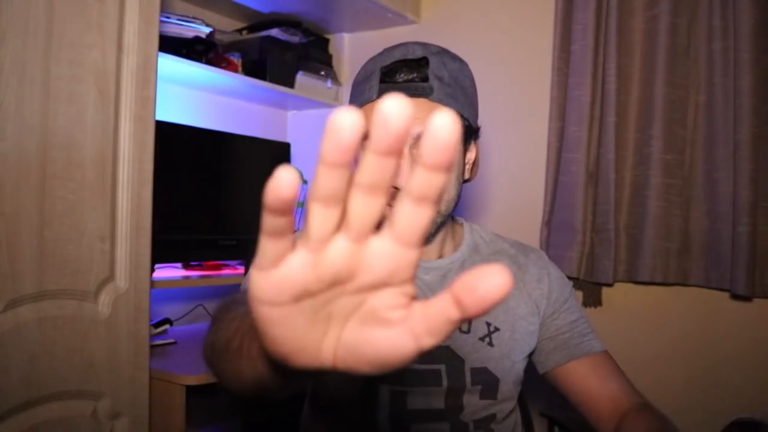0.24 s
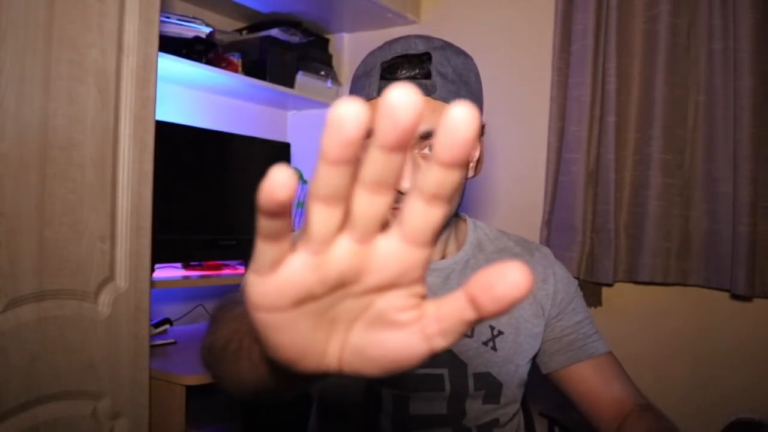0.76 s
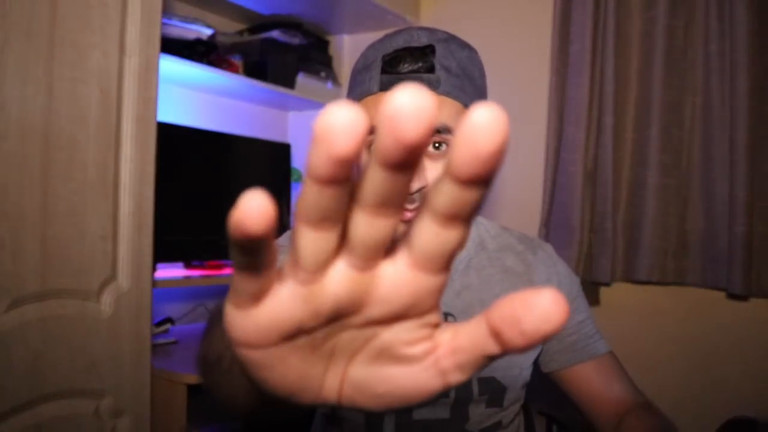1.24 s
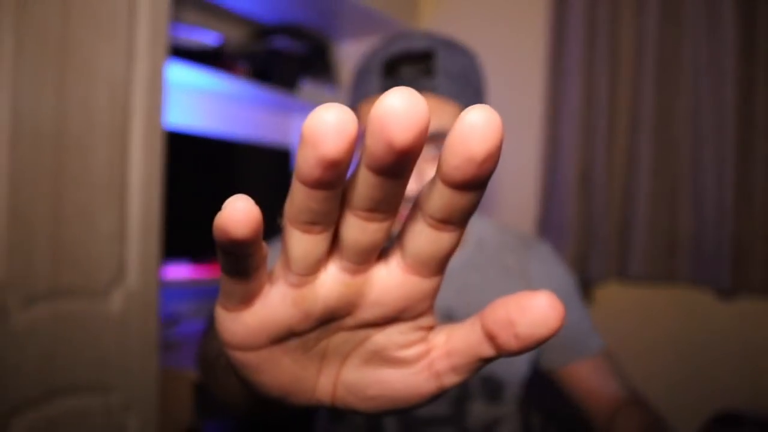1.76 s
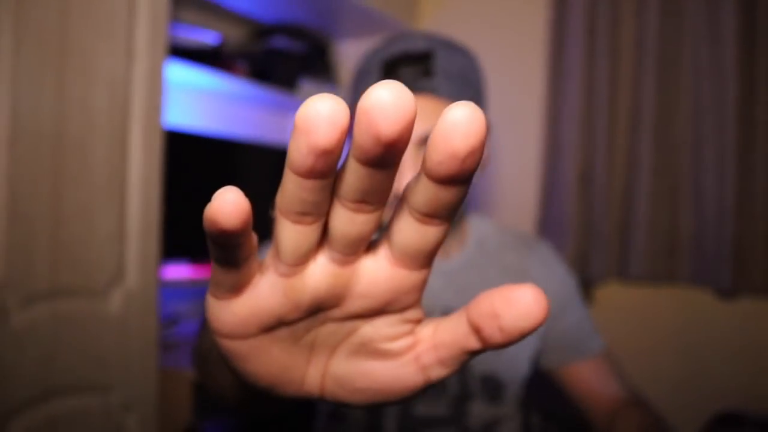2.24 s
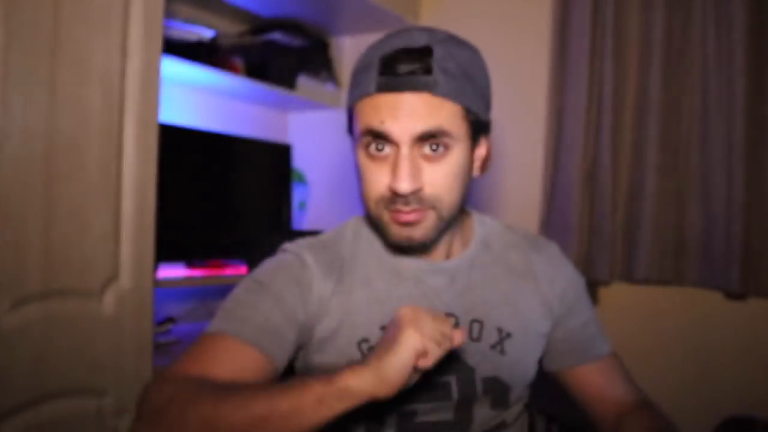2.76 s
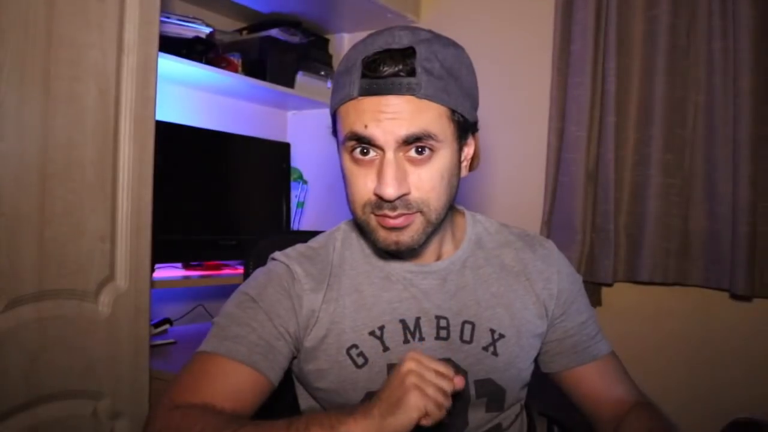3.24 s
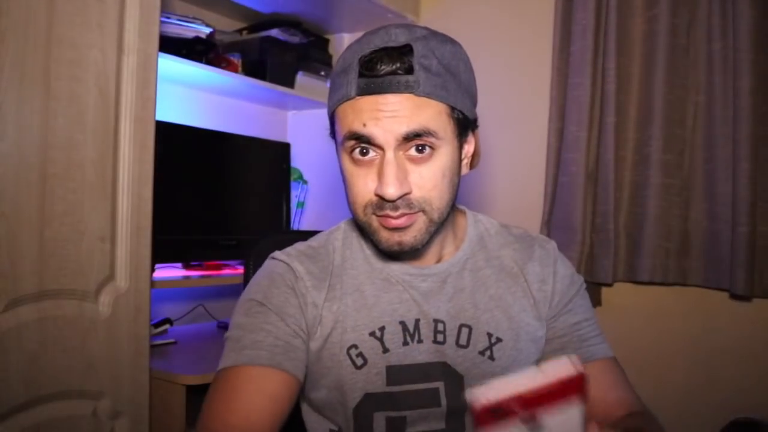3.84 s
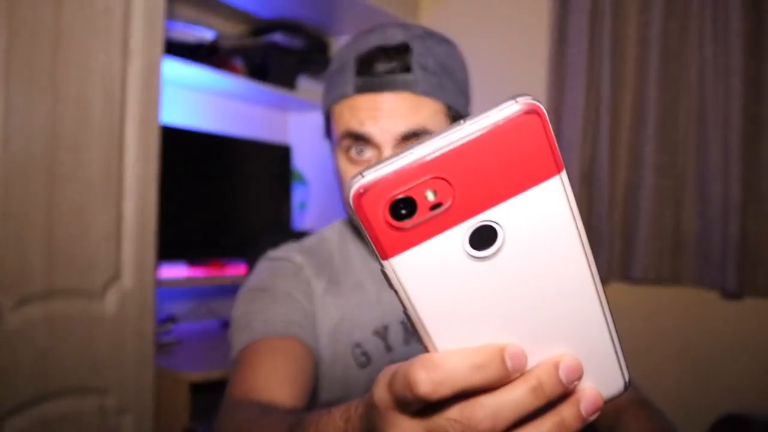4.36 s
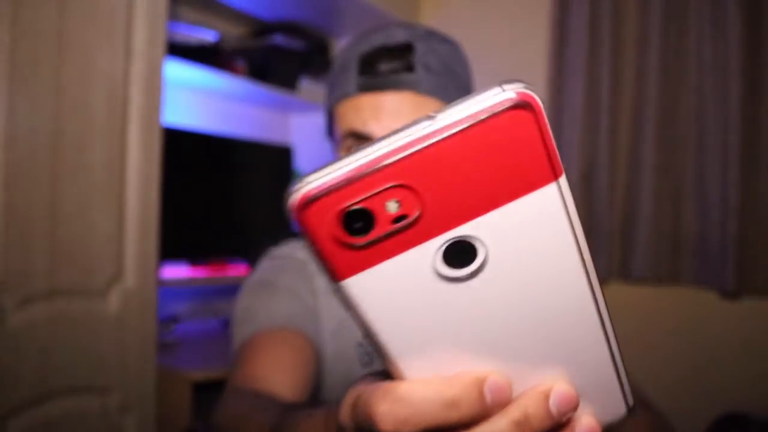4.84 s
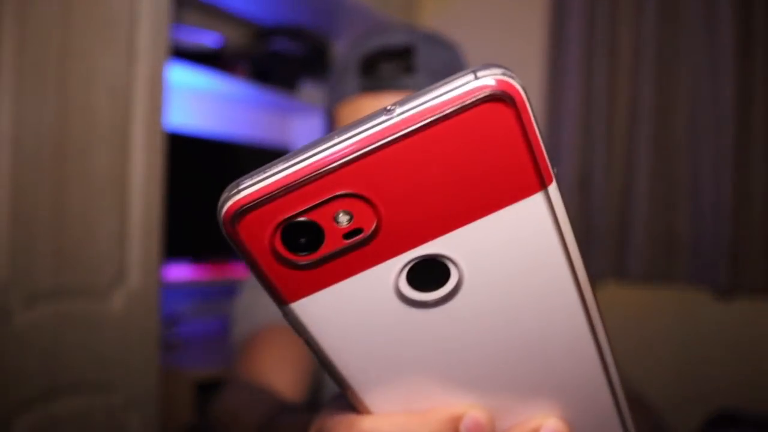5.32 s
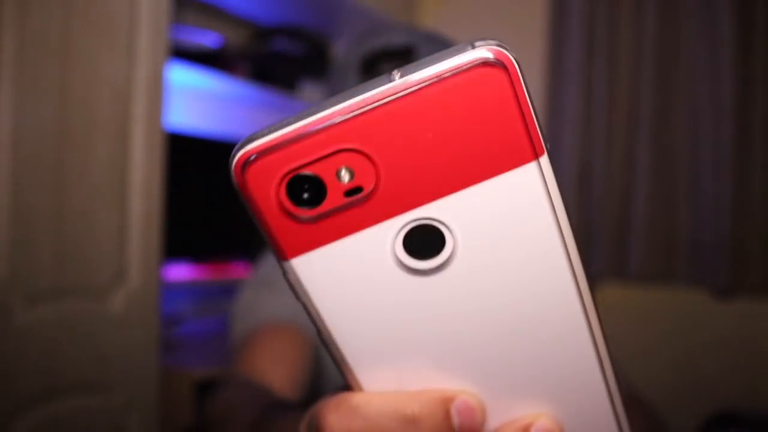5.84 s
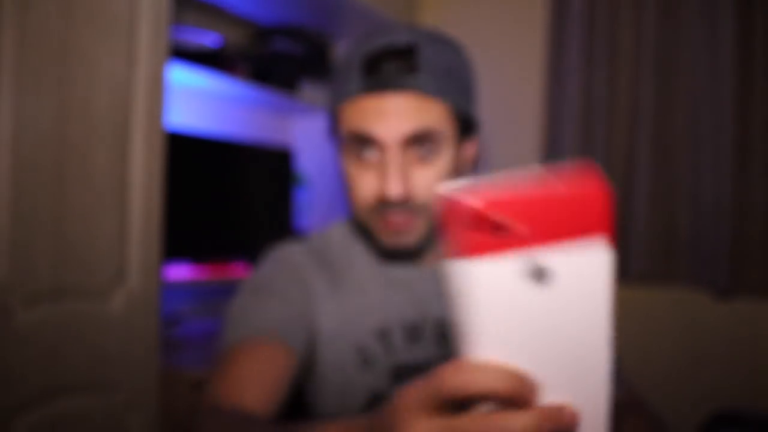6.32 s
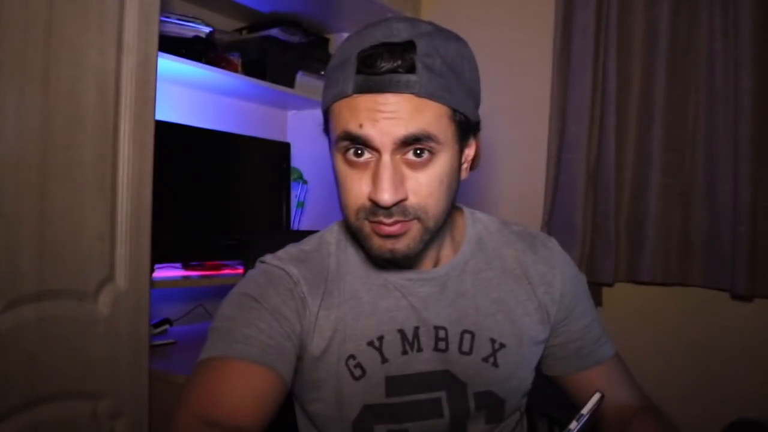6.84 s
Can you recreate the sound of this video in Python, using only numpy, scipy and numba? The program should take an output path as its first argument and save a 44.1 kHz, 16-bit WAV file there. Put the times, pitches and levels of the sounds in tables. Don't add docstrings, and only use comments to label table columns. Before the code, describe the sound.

A camera lens focus motor buzzes and whirs in short gritty bursts with clicks and low housing knocks, close up in a quiet hissy room.

```python
import sys
import numpy as np
from scipy import signal
from scipy.fft import rfft, irfft
from scipy.io import wavfile
from scipy.ndimage import uniform_filter1d
from numba import njit

SR = 44100
rng = np.random.default_rng(int(sys.argv[2]) if len(sys.argv) > 2 else 0)


def unload_audio(sound):
    columns = np.transpose(np.atleast_2d(sound))
    steps = np.round(np.clip(columns, -1, 1) * 32767)
    wavfile.write(sys.argv[1], SR, steps.astype(np.int16))


def decibels_to_gain(level_db):
    exponent = np.asarray(level_db, float) / 20
    return 10 ** exponent


N = 312228

# start_s, knock_db, click_db, free_ring_db (how freely the housing rings on)
KNOCKS = [(1.110, -19, -17.5, 0), (1.195, -42.5, -60, 11), (1.311, -47, -70, -3), (1.407, -31.5, -40, -1),
          (1.829, -36, -52, 1), (1.956, -28, -21, -7), (2.174, -42, -53, 8), (2.419, -47, -48, 3),
          (2.695, -31, -50, -17), (3.153, -20.5, -21, -5), (3.222, -43, -44, 5), (3.495, -38.5, -44, 1),
          (3.53, -43, -46, 7), (3.616, -35.5, -58, 2), (3.69, -46, -70, 5), (4.253, -32, -43, -4),
          (4.599, -47, -70, 1), (4.652, -35, -55, -14), (4.772, -37.5, -48, 2), (4.877, -52, -40, 3),
          (5.036, -36.5, -28, 5.5), (5.139, -36, -69, 4.5), (6.506, -19, -45, -25),
          (7.026, -19, -17.5, -1.5)]


@njit
def add(out, x, pole, twice, left, right):
    a, b = 0j, 0j
    for i in range(len(x)):
        a = a * pole + x[i]
        b = b * pole * twice + a
        out[0, i] += (left * b).real
        out[1, i] += (right * b).real


def held(rate_hz):
    hold = max(int(SR / rate_hz), 1)
    steps = np.repeat(rng.standard_normal(N // hold + 2), hold)[:N]
    return 1.37 * uniform_filter1d(steps, hold)


def floor():
    # freq_hz, level_db_per_hz
    spectrum = [(12, -44), (20, -6.5), (58, -10), (91, -2.5), (127, -2.5), (150, -4.5), (210, -0.5),
                (228, -7.5), (410, -8.5), (472, -10), (513, -9.5), (660, -11.5), (1260, -13.5),
                (2670, -15.5), (16000, -28.5)]
    floor_db, wander_db, wander_hz = -55.5, 0.5, 3.58
    alike_hz, hiss_top_hz = 109, 12700
    hz = np.arange(N // 2 + 1) * SR / N + 1
    knot_hz, knot_db = np.transpose(spectrum)
    gain = decibels_to_gain(np.interp(np.log(hz), np.log(knot_hz), knot_db)) / np.sqrt(1 + (hz / hiss_top_hz) ** 4)
    mid, side = (rfft(rng.standard_normal(N)) * gain for _ in range(2))
    alike = 1 / (1 + hz / alike_hz)
    mid, side = mid * np.sqrt(1 + alike), side * np.sqrt(1 - alike)
    pair = irfft([mid + side, mid - side], N)
    return pair * decibels_to_gain(floor_db + wander_db * held(wander_hz)) / pair.mean(axis=0).std()


def rustle():
    # start_s, length_s, level_db, centre_hz, width_hz
    rustles = [(0.08, 0.21, -58, 7500, 9000), (0.74, 0.048, -51, 3900, 6940), (2.524, 0.2, -47.5, 430, 120),
               (2.563, .13, -59, 1270, 920), (3.523, 0.16, -56.5, 8550, 9000),
               (3.774, 0.096, -53.5, 1300, 2200), (3.886, 0.033, -59, 8960, 8000),
               (4.121, 0.17, -57.5, 8250, 6060), (5.355, 0.03, -50, 600, 895),
               (5.462, 0.033, -49, 404, 600), (5.782, 0.033, -48, 500, 800)]
    rise_per_octave, tap_hz = 0.05, 200
    grain_db, grain_rate_hz = 1.1, 217
    out = np.zeros((2, N))
    for start_s, length_s, db, hz, width_hz in rustles:
        i, n = int(start_s * SR), int(length_s * SR)
        grain = rng.standard_normal((2, SR // 3)) * decibels_to_gain(grain_db * held(grain_rate_hz)[:SR // 3])
        edges_hz = [max(hz - width_hz / 2, 60), min(hz + width_hz / 2, 18000)]
        band = signal.sosfilt(signal.butter(2, edges_hz, "band", fs=SR, output="sos"), grain)
        peak = np.clip(rise_per_octave * np.log2(hz / tap_hz), 0.01, 0.95)
        swell = np.interp(np.arange(n) / n, [0, peak, 1], [0, 1, 0])
        out[:, i:i + n] += decibels_to_gain(db) * swell * band[:, :n] / band.std()
    return out


def motion():
    # start_s, length_s, level_db, fade_db (over the move), wind_up_db (below speed at the start)
    runs = [(1.094, 0.072, -20.5, -0.5, 3), (1.415, 0.073, -24.5, 4.5, 2), (1.536, 0.042, -21.5, -10, 8.5),
            (1.617, 0.037, -33.5, 2.5, -0.5), (1.659, 0.15, -21, 0, -1), (1.938, 0.033, -26.5, -9.5, 5.5),
            (2.686, 0.32, -23, 0.16, 23.5), (3.136, 0.055, -24.5, -9.5, 3.5), (3.215, 0.02, -35, -2, 3),
            (4.287, 0.2, -21.5, -0.04, 17.5), (4.972, 0.035, -21, -4.5, 6), (5.017, 0.1, -21.5, -1.5, -0.5),
            (6.4934, 0.3937, -22.5, -0.26, 7.5), (7.0123, 0.043, -23.5, -5, 0.5)]
    # start_s, length_s, level_db, fade_db (over the step)
    steps = [(2.172, 0.014, -46.5, 2.5), (2.214, 0.016, -47, 1), (2.249, 0.024, -50, 10),
             (2.298, 0.012, -40.5, -7), (2.338, .028, -42, 1), (2.384, 0.014, -37, -1),
             (2.417, 0.0036, -39.5, -6.5), (3.495, 0.01, -45.5, -4), (3.532, 0.0024, -44.5, -11),
             (3.615, 0.013, -44, -3.5), (4.256, 0.022, -44, 10), (4.655, 0.0031, -41, -2.5),
             (4.771, 0.012, -47.5, 2), (4.811, 0.015, -55.5, 2), (4.852, 0.018, -50.5, 11),
             (4.898, 0.019, -43, 4.5), (4.941, 0.018, -41.5, 8.5)]
    # start_s, share_racking_out (0-1)
    heading = [
        (0, .06),
        (1.9, 0.53),
        (2.1, 0.35),
        (2.405, .95),
        (3.1, 0.1),
        (4.6, 0.2),
        (4.83, 0.05),
        (4.96, .02),
        (6.4, 0.68),
        (6.98, .04),
    ]
    run_rise_db_ms, step_rise_db_ms, stop_db_ms = 4.5, 3, 0.98
    wind_up_ms, breakaway_ms, breakaway_db = 19.6, 3.1, 2.5
    full_speed_db, slow_dulls, brightest_db, dullest_db = -27.5, 0.39, 0.63, -5.5
    wind_up_dulls, fade_dulls, stop_dulls = 0.32, 0.5, 0.3
    ms = np.arange(N) / SR * 1000
    level, bright, share_out = np.full(N, -120.), np.zeros(N), np.zeros(N)
    turns_s, shares = np.transpose(heading)
    for start_s, length_s, db, fade_db, wind_db in runs + [(*step, 0) for step in steps]:
        driven = wind_db != 0
        t, end = ms - 1000 * start_s, 1000 * length_s
        fade = fade_db * np.clip(t / end, 0, 1)
        lag = wind_db * np.clip(1 - t / wind_up_ms, 0, 1)
        rise = (run_rise_db_ms if driven else step_rise_db_ms) * np.minimum(t, 0)
        now = db + fade - lag + rise - stop_db_ms * np.maximum(t - end, 0)

        speed_db = db + max(fade_db, 0) / 2 - full_speed_db
        tone = np.clip(slow_dulls * speed_db, dullest_db, brightest_db) - wind_up_dulls * lag
        tone += fade_dulls * np.minimum(fade, 0) - stop_dulls * np.clip(t - end, 0, 40)
        if driven:
            tone += breakaway_db * np.exp(-np.abs(t) / breakaway_ms)

        top = now > level
        level[top], bright[top] = now[top], tone[top]
        share_out[top] = shares[turns_s <= start_s][-1]
    return level, bright, share_out


def barrel(level, bright, share_out):
    # freq_hz, width_hz, left_db, right_db
    modes_out = [(121, 81, -19, -8), (294, 130, -23.5, -15.5), (495, 170, -30, -33),
                 (727, 143, -11.5, -12.5), (866, 172, -14, -5.5), (1174, 126, -20.5, -13.5),
                 (1324, 56, -8, -7.5), (1600, 600, -7, -17), (1718, 88, 1, -2.5), (1876, 500, -7, -13),
                 (2260, 430, -15, -9), (2665, 190, -4.5, -21), (2897, 230, -2.5, -3), (3250, 210, -13, -8),
                 (3373, 135, -1.5, -0.5), (3430, 570, -7, -6), (4130, 140, -8, -17),
                 (4460, 370, -17.5, -22), (5110, 660, -14.5, -15.5), (5670, 340, -13.5, -13),
                 (6320, 540, -14, -12.5), (7090, 270, -19, -14.5), (7680, 570, -16.5, -14.5),
                 (8690, 580, -18, -17.5), (9600, 530, -14, -21), (10350, 1200, -17.5, -16),
                 (11470, 1200, -19.5, -32), (12060, 500, -21.5, -20.5), (13710, 870, -30, -26),
                 (15220, 1230, -34, -28.5)]
    # freq_hz, width_hz, left_db, right_db
    modes_in = [(146, 82, -17.5, -17), (251, 113, -34, -22), (480, 210, -33, -35), (766, 260, -19.5, -27),
                (890, 750, -43, -22), (1158, 143, -14, -12.5), (1333, 180, -11, -19),
                (1502, 260, -8, -12.5), (1672, 220, -7.5, -19), (2010, 320, -9.5, -9.5),
                (2354, 454, -7.5, -8.5), (2675, 190, 1, -8), (2880, 195, -7, -6), (3210, 170, -9, -19),
                (3484, 600, -15, -7.5), (3673, 260, -5.5, -29.5), (4130, 310, -12, -14.5),
                (4700, 430, -39, -33), (5105, 810, -18, -16.5), (5480, 780, -14, -20.5),
                (6370, 620, -21, -21.5), (7130, 1080, -37, -22), (8160, 790, -23.5, -35.5),
                (8770, 1140, -29, -35), (9280, 290, -16.5, -16.5), (10500, 500, -31.5, -24.5),
                (11050, 490, -19.5, -25.5), (12060, 320, -24.5, -25), (13800, 750, -31.5, -28),
                (15230, 2150, -43, -40)]
    pickup = [(1.2, .7), (1.55, .8), (.05, .96), (-.4, .9), (.55, .92), (-1.2, .8), (-2.5, .99),
              (-2.5, .88), (-.4, .95), (-.9, .93), (1.1, .8), (-2.4, .85), (-2.1, .95), (-2.4, .95),
              (-.6, .99), (-1, .75), (-2.05, .55), (.3, .75), (.4, .5), (-2.55, .55), (-2.4, .55),
              (-1.65, .85), (2.3, .65), (-.15, .85), (3.14, .68), (-3.05, .6), (3.1, .45), (.7, .75),
              (-1.75, .4), (2.4, .4)]
    grit_rate_hz, grit_db, drag_rate_hz, drag_db = 2500, 2, 110, 0.81
    judder_rate_hz, judder_db, choke_hz, choke_db = 170, 2, 1800, -6
    on = np.flatnonzero(level > -95)
    near, out, noise = np.zeros((2, len(on))), np.zeros((2, N)), rng.standard_normal(N)
    rub_db = (level + grit_db * held(grit_rate_hz) + drag_db * held(drag_rate_hz))[on]
    creep = np.clip((-24 - level[on]) / 12, 0, 1)
    rub_db += judder_db * creep * held(judder_rate_hz)[on]
    for modes, share in ((modes_out, share_out[on]), (modes_in, 1 - share_out[on])):
        for (hz, width_hz, left_db, right_db), (lead_rad, alike) in zip(modes, pickup):
            tilt = np.clip(np.log2(hz / 2600), -1.2, 1.8)
            choke = choke_db * np.exp(-(np.log2(hz / choke_hz) / 0.22) ** 2)
            force = np.sqrt(share) * decibels_to_gain(rub_db + tilt * bright[on] + choke * creep)
            both, own = (force * noise[(on + rng.integers(N)) % N] + 1e-18 for _ in range(2))
            r = np.exp(-np.pi * width_hz / SR)
            pole = r * np.exp(2j * np.pi * hz / SR)
            gain = (1 - r) ** 2 * decibels_to_gain(26.0 - 2.8 * (hz < 200)) + 0j
            left, right = gain * decibels_to_gain(left_db), gain * decibels_to_gain(right_db)
            add(near, both, pole, 1., left, right * alike * np.exp(1j * lead_rad))
            add(near, own, pole, 1., 0j, right * np.sqrt(1 - alike ** 2))
    out[:, on] = near
    return out


def housing(level, share_out):
    # freq_hz, left_db, right_db, t60_s, shake_db (response to the running motor)
    modes = [(88.7, -17, -14, 0.62, -3), (117.4, -29.5, -23, 0.22, 17.5), (158.3, -18.5, -7.5, 0.78, -3),
             (168, -8.5, -2, 0.072, -11.5), (178.7, -13, -8, 0.39, -30), (255.4, -37, -4.5, 0.088, 1.5),
             (325.5, -16, -10, 0.082, 5.5), (456.6, -8, -15, 0.09, -6), (2800, -44, -52, 0.42, 54.5),
             (3420, -48, -46, 0.32, 47)]
    shake_base_db, low_shake_slope = -66, 0.12
    knock_cycles, right_lead_rad, chance_db = 1.48, 1.7, 3.7
    sway_ring_share = 0.36
    out = np.zeros((2, N))
    chance = rng.standard_normal((len(KNOCKS), len(modes)))
    for k, (hz, left_db, right_db, t60_s, shake_db) in enumerate(modes):
        slope = low_shake_slope if hz < 1500 else 1
        shake = decibels_to_gain(shake_base_db + shake_db + slope * level) * (level > -65)
        push = shake * rng.standard_normal(N) + 1e-18
        if hz > 3100:
            push *= share_out
        elif hz > 1500:
            push *= 1 - share_out

        n = int(2 * knock_cycles * SR / hz)
        blow = np.hanning(n) * np.cos(2 * np.pi * hz * np.arange(n) / SR) * 4 / n
        ring_share = (t60_s > 0.25) * (1 if k else sway_ring_share)
        for (start_s, knock_db, _, ring_db), luck in zip(KNOCKS, chance[:, k]):
            i = int(start_s * SR)
            push[i:i + n] += decibels_to_gain(knock_db + ring_db * ring_share + chance_db * luck) * blow

        pole = np.exp(2j * np.pi * hz / SR - np.log(1000) / (t60_s * SR))
        add(out, push, pole, 0., -1j * decibels_to_gain(left_db), -1j * decibels_to_gain(right_db) * np.exp(1j * right_lead_rad))
    return out


def clicks():
    out, tap = np.zeros((2, N)), np.full(N, 1e-18)
    for start_s, _, click_db, _ in KNOCKS:
        tap[int(start_s * SR)] = decibels_to_gain(click_db)
    for hz, t60_s in ((1600, 0.0041), (2800, 0.0056), (5200, 0.0048)):
        pole = np.exp(2j * np.pi * hz / SR - np.log(1000) / (t60_s * SR))
        add(out, tap, pole, 0., -1.3j, 1.1 + 0j)
    return out


def dull_room(near):
    t60_s, room_db, dull_hz = 0.3, -40, 3500
    t = np.arange(SR // 2) / SR
    tail = rng.standard_normal((2, SR // 2)) * np.exp(-np.log(1000) * t / t60_s)
    tail = signal.sosfilt(signal.butter(1, dull_hz, fs=SR, output="sos"), tail)
    tail /= np.sqrt((tail[0] ** 2).sum())
    return decibels_to_gain(room_db) * signal.fftconvolve(near, tail, axes=1)[:, :N]


def scene():
    level, bright, share_out = motion()
    near = barrel(level, bright, share_out) + housing(level, share_out) + clicks()
    near = signal.sosfilt(signal.butter(2, 80, "high", fs=SR, output="sos"), near)
    return near + dull_room(near) + rustle() + floor()


def low_pass(x):
    return signal.sosfilt(signal.butter(12, 16000, fs=SR, output="sos"), x)


def record(dry):
    band = signal.sosfilt(signal.butter(1, 25, "high", fs=SR, output="sos"), dry)
    band = signal.sosfilt(signal.ellip(10, 0.2, 70, 15800, fs=SR, output="sos"), band)
    return low_pass(band)


dry = scene()
out = record(dry)
unload_audio(out)
```